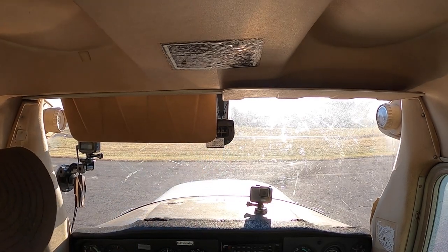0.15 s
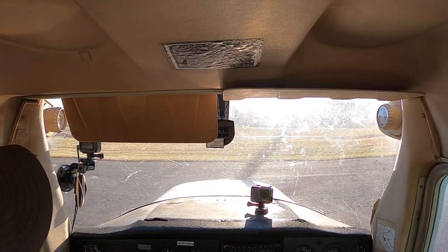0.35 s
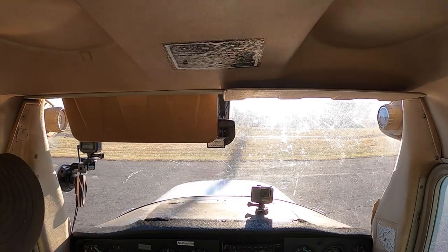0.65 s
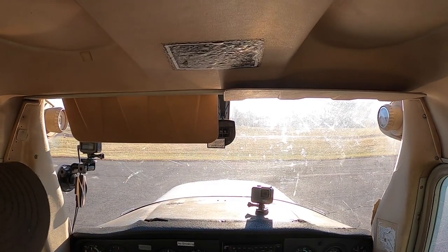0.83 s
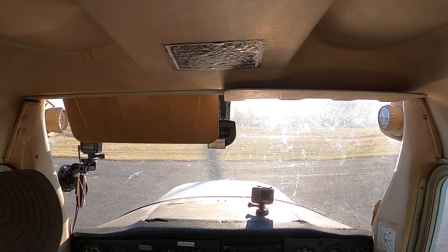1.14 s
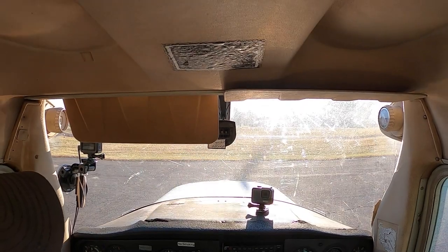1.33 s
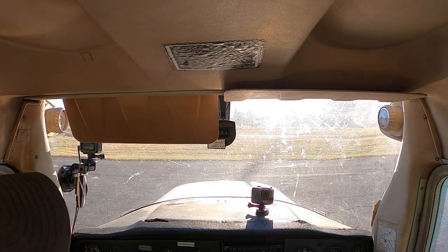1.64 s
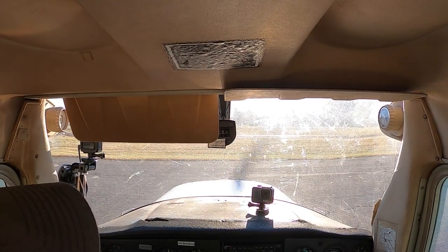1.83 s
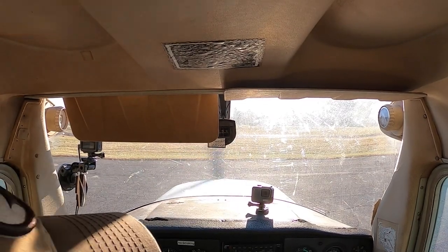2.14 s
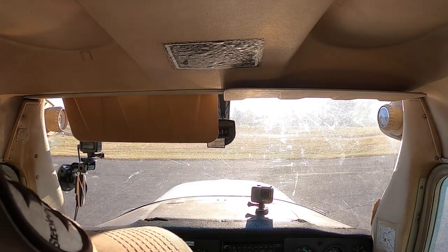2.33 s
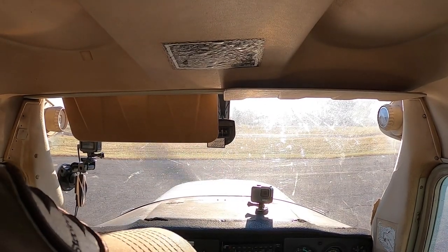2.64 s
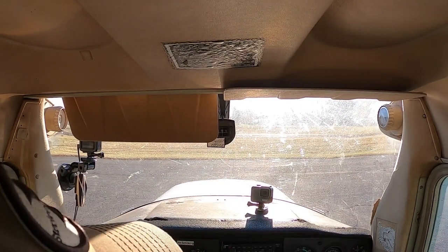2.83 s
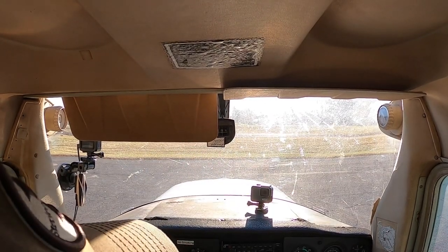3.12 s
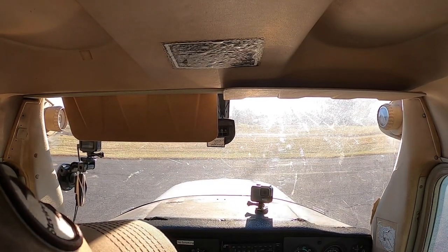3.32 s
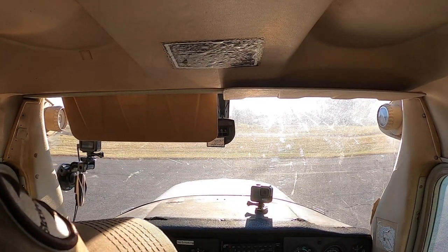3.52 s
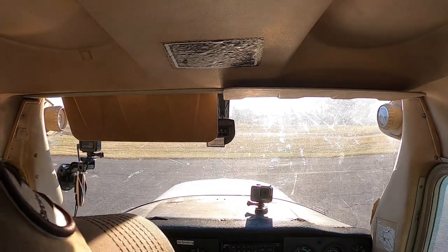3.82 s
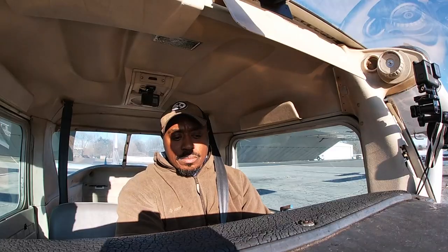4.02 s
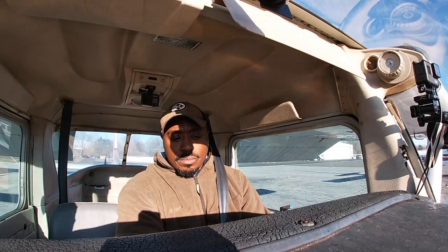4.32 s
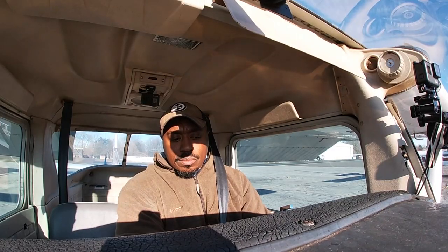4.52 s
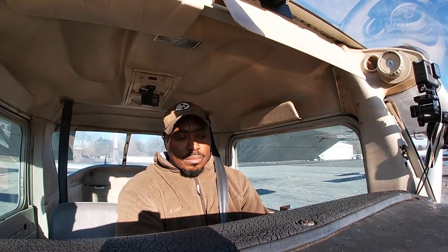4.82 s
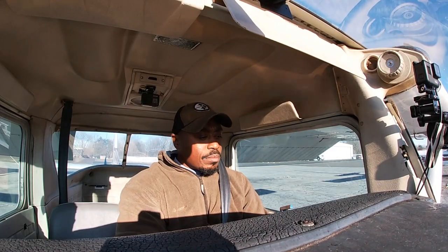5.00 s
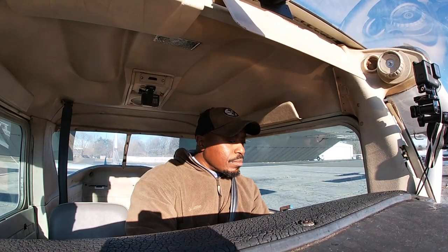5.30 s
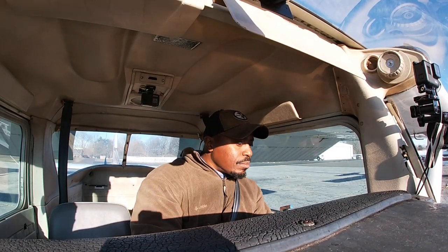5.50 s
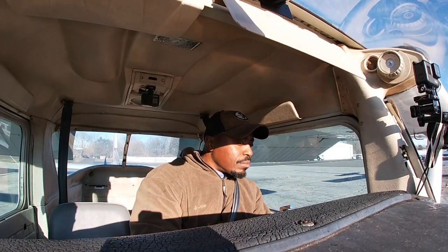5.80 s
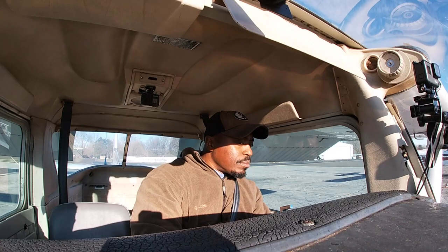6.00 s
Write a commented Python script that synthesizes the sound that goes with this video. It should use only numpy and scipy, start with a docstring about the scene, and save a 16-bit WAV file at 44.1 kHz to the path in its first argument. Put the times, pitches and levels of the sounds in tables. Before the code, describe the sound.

Inside a small plane's cabin, a piston engine catches with metallic clanks and heavy thumps, then climbs to a droning, finally lumpy idle with occasional sharp ticks.

```python
"""A four-cylinder light aircraft engine, heard in the cockpit, catches with a clank and a shudder over the starter's grind.
It runs up to a fast idle: low tones of exhaust and propeller excite the cabin's air modes as they rise.
Every firing rings noise in the panels, over a hiss of valve gear and prop wash; near four seconds the idle turns lumpy.
From early on, a sharp tick, probably the strobe light, repeats about every one and a half seconds."""
import sys
import numpy as np
from scipy import signal
from scipy.fft import rfft, irfft, next_fast_len
from scipy.io import wavfile
from scipy.ndimage import uniform_filter1d, minimum_filter1d, map_coordinates

SR = 44100
rng = np.random.default_rng(int(sys.argv[2]) if len(sys.argv) > 2 else 0)


def wrap_up_sound(samples):
    """Save the sound to the file named by the first command line argument, as 16-bit audio."""
    columns = np.atleast_2d(samples).T
    # keep every value between -1 and 1, then stretch to whole-number steps
    tamed = np.clip(columns, -1, 1)
    steps = np.round(tamed * 32767).astype(np.int16)
    wavfile.write(sys.argv[1], SR, steps)


N = 271215

# Unequal cylinders. Each entry: mean strength of one firing in the cycle, in dB.
FIRING_STRENGTHS = [1, -1, 3.5, -2]


def amp(db):
    """Decibel law: 20 dB is a tenfold amplitude."""
    return 10 ** (np.asarray(db) / 20)


def unit(x):
    """Power normalisation: scale to rms 1."""
    return x / np.sqrt(np.mean(x ** 2) + 1e-20)


def curves(rows):
    """Linear interpolation: one value per sample for each column after the time."""
    s, *cols = np.transpose(rows)
    return [np.interp(np.arange(N) / SR, s, c) for c in cols]


def wobble(rate):
    """Band-limited fluctuation: a smooth curve through random knots, rate of them a second."""
    knots = rng.standard_normal(int(N * rate / SR) + 4)
    return map_coordinates(knots, [np.arange(N) * rate / SR])


def resonance_db(hz, modes, order):
    """Resonance: lift in dB near each mode (Hz, width in Hz, lift in dB); order sets the skirts."""
    return sum(lift / (1 + (2 * (hz - centre) / width) ** order) for centre, width, lift in modes)


def colour(x, points, modes=()):
    """Minimum-phase filtering: the folded cepstrum makes a causal response through (Hz, dB) points."""
    m = 2 * next_fast_len(len(x) // 2 + SR // 4)
    hz = np.fft.rfftfreq(m, 1 / SR)
    f, points_db = np.transpose(points)
    db = np.interp(np.log(hz + 1), np.log(f), points_db)
    db = db + resonance_db(hz, modes, order=2)
    cepstrum = irfft(np.log(amp(db) + 1e-6))
    cepstrum[1:m // 2] *= 2
    cepstrum[m // 2 + 1:] = 0
    response = np.exp(rfft(cepstrum))
    return irfft(rfft(x, m) * response, m)[:len(x)]


def dying(t60):
    """Exponential decay: a half-second envelope falling 60 dB in each t60 seconds."""
    return np.exp(-np.log(1000) * np.arange(SR // 2) / SR / t60)


def burst(t60):
    """Diffuse decay: white noise under an exponential envelope."""
    return dying(t60) * rng.standard_normal(SR // 2)


def add(track, s, sound):
    """Superposition: mix a sound in at time s."""
    start = max(round(s * SR), 0)
    track[start:start + len(sound)] += sound[:N - start]


def engine(rate):
    """Impulsive excitation: firings drive the boom, the exhaust thud, the panels and the valve gear."""
    # Each row: frequency in Hz, relative level in dB.
    thud_spectrum = [(60, -29), (120, -2), (170, 1), (220, -2), (290, -7), (345, -10.5), (420, -17),
                     (700, -52.5), (1500, -93.5)]
    rattle_spectrum = [(200, -25), (330, 1), (450, 1), (620, 0.5), (800, -8.5), (950, -4), (1300, -12),
                       (1550, -17), (1850, -22.5), (2400, -32.5), (4000, -48), (7000, -86)]
    gear_spectrum = [(1000, -32.5), (1700, -2), (1830, -4), (1970, -5), (2180, -8.5), (2880, -9.5),
                     (3700, -13.5), (5450, -13), (7000, -29.5), (8110, -26.5), (9850, -25), (12900, -33),
                     (15500, -36.5)]
    # Cabin panel resonances. Each row: frequency in Hz, width in Hz, lift in dB.
    panel_modes = [(402, 68, 4), (533, 33, 4), (725.6, 16, 9), (874.5, 130, 4), (1377, 72, 6),
                   (2920, 130, 1.5)]
    # Layer gains. Columns: dB at smooth final idle, dB more at full effort,
    # dB per doubling of speed, dB more once lumpy.
    thud_gain = (-30.6, 11.5, -5.5, 2.4)
    rattle_gain = (-36, 20.5, 6, 3.6)
    gear_gain = (-54.4, 13.5, 1.3, 2.3)
    growl_s, growl_width_s, growl_db = .78, .14, 6  # one swell of the panels as it picks up speed

    turn = np.cumsum(rate * (1 + .002 * wobble(16))) / SR  # counts the firings
    thud = firings(turn, ring_t60=0.13, loose=0.5, scatter_db=2.0, depth=1.3)
    thud = unit(colour(thud, thud_spectrum))
    rattle = firings(turn, ring_t60=0.22, loose=0.63, scatter_db=1.0, depth=0.19)
    rattle = unit(colour(rattle, rattle_spectrum, panel_modes))
    gear = firings(turn, ring_t60=0.2, loose=.75, scatter_db=2.5, depth=0.26)
    gear = unit(colour(gear, gear_spectrum, panel_modes))

    swell = np.exp(-((np.arange(N) / SR - growl_s) / growl_width_s) ** 2)
    body = level(rate, *thud_gain) * thud
    body += amp(growl_db * swell) * level(rate, *rattle_gain) * rattle
    body += level(rate, *gear_gain) * gear
    return boom(turn, rate, waver_db=0.7) + body


def boom(turn, rate, waver_db, slip=0.014, stumble_db=1.3):
    """Harmonic series: low orders of exhaust and propeller, with the lope of unequal cylinders."""
    # Each row: order of the firing rate, level in dB before the cabin modes and layer gain.
    exhaust_orders = [(1, -35), (3, -36), (4, -39)]
    # Harmonics of the whole four-firing cycle, some of which sing in the panels.
    # Each row: harmonic number, level in dB before the layer gain.
    lope_harmonics = [(1, -39.5), (3, -42.5), (5, -30), (7, -29.5), (11, -37), (14, -40), (15, -39.5),
                      (19, -43.5), (20, -40.5), (24, -44.5), (27, -48.5), (32, -47.5), (41, -46.5),
                      (49, -50.5), (52, -50.5), (57, -49)]
    # Layer gains. Columns: dB at smooth final idle, dB more at full effort,
    # dB per doubling of speed, dB more once lumpy.
    exhaust_gain = (0, 1, -1.5, -2.5)
    lope_gain = (-6.2, 7, -2, 7.8)
    # The propeller tone, at twice the firing rate, fades below prop_full_hz.
    prop_base_db, prop_full_hz, prop_db_per_octave = -14, 65.6, 41.5
    prop_mode_share = 0.087  # share of the cabin's lift in dB

    def tone(phase):
        """Simple harmonic motion at rms 1, phase in cycles."""
        return np.sqrt(2) * np.cos(2 * np.pi * phase)

    blade_hz = 2 * rate
    octaves_below = np.minimum(0, np.log2(blade_hz / prop_full_hz))
    prop_db = prop_base_db + prop_db_per_octave * octaves_below + prop_mode_share * cabin_db(blade_hz)
    prop = amp(prop_db) * tone(2 * turn)

    exhaust = np.zeros(N)
    for order, db in exhaust_orders:
        order_db = db + cabin_db(order * rate) + waver_db * wobble(14)
        exhaust += amp(order_db) * tone(order * turn)

    cycle = turn / len(FIRING_STRENGTHS)
    lope = np.zeros(N)
    for k, db in lope_harmonics:
        # no two cycles burn alike, which blurs the higher harmonics most
        blur = slip * np.sqrt(k) * wobble(18)
        lope += amp(db + 1.8 * wobble(5)) * tone(k * cycle + rng.random() + blur)
    stumble = amp(stumble_db * wobble(9))
    return prop + level(rate, *exhaust_gain) * exhaust + level(rate, *lope_gain) * stumble * lope


def firings(turn, ring_t60, loose, scatter_db, depth):
    """Convolution: each cylinder repeats its own ring; a loose share of the power is fresh turbulence."""
    at = np.flatnonzero(np.diff(np.floor(turn))) + 1
    count = len(FIRING_STRENGTHS)
    cylinder = np.floor(turn[at]).astype(int) % count
    size = amp(np.take(FIRING_STRENGTHS, cylinder) + scatter_db * rng.standard_normal(len(at)))
    size = size / np.sqrt(np.gradient(turn)[at])  # the power stays even as the speed changes
    blows = np.zeros((count, N))
    blows[cylinder, at] = size
    rings = np.array([burst(ring_t60) for _ in range(count)])
    locked = signal.fftconvolve(blows, rings, axes=1)[:, :N].sum(axis=0)
    puffs = unit(signal.fftconvolve(blows.sum(axis=0), dying(ring_t60))[:N])
    gas = (1 + depth * puffs) * rng.standard_normal(N)
    return np.sqrt(1 - loose) * unit(locked) + np.sqrt(loose) * unit(gas)


def level(rate, idle_db, effort_db, octave_db, lumpy_db):
    """Source strength: a layer's gain follows effort, speed and the turn to a lumpy idle."""
    # It catches hard on the priming fuel, then eases. Each row: time in seconds, effort from 0 to 1.
    effort_curve = [(.01, .3), (.05, .7), (.3, 0.7), (.39, 1), (.45, .8), (.53, .24), (.62, .08),
                    (.95, 0.04)]
    lope_s, lope_onset_s = 3.99, 0.33  # when the idle turns lumpy, and how gradually
    effort, = curves(effort_curve)
    lumpy = (1 + np.tanh((np.arange(N) / SR - lope_s) / (2 * lope_onset_s))) / 2
    octaves = np.log2(rate / rate[-1])
    return amp(idle_db + effort_db * effort + octave_db * octaves + lumpy_db * lumpy)


def cabin_db(hz):
    """Room modes: the cabin's air lifts a low tone that sweeps through its resonances."""
    # Each row: frequency in Hz, width in Hz, lift in dB.
    air_modes = [(47.7, 12, 14.5), (78, 19, 19), (117.8, 19, 15.5), (146.8, 11, 9), (197.9, 14, 9)]
    return resonance_db(hz, air_modes, order=4)


def starter():
    """Modal excitation: clanks and a grind of irregular tooth blows ring the same steel."""
    # Starter and mounts clank as it catches. Each row: start in seconds, level in dB, t60 in seconds.
    clank_events = [(0.039, -18, 0.16), (.071, -24.5, 0.096), (0.124, -24, 0.26), (0.184, -26, 0.11),
                    (.25, -32, 0.14), (.317, -28.5, 0.33), (0.346, -24.5, 0.16)]
    # Each row: frequency in Hz, relative level in dB.
    metal_spectrum = [(200, -27), (450, -3), (650, -5), (900, 4), (1150, -5), (1600, -9.5), (2300, -10.5),
                      (3300, -14), (4200, -16.5), (5500, -19.5), (7000, -36.5), (8400, -33), (12000, -42.5),
                      (14000, -66.5)]
    # Ringing of the gear and mounts. Each row: frequency in Hz, width in Hz, lift in dB.
    steel_modes = [(865, 22, 10.5), (1384, 26, 8.5), (1600, 25, 3), (1846, 70, 7), (2560, 26, 4),
                   (2800, 84, 7.5)]
    # It labours against each compression stroke until it drops out and spins down.
    base_db, labour_db, first_stroke_s, stroke_s = -37.5, 4, .05, .15
    drop_out_s, spin_down_db_per_s = .44, 95
    teeth_per_s = 1100  # mean rate of random blows

    t = np.arange(N) / SR
    labour = np.cos(2 * np.pi * (np.minimum(t, drop_out_s) - first_stroke_s) / stroke_s)
    grind_db = base_db + labour_db * labour - spin_down_db_per_s * np.maximum(0, t - drop_out_s)
    teeth = (rng.random(N) < teeth_per_s / SR) * rng.standard_normal(N)
    out = amp(grind_db) * unit(colour(teeth, metal_spectrum, steel_modes))
    for s, db, t60 in clank_events:
        noise = unit(colour(rng.standard_normal(SR // 2), metal_spectrum, steel_modes))
        envelope = dying(t60) - dying(0.005)  # a short rise, then the decay
        add(out, s, amp(db) * envelope * noise)
    return out


def airframe(rate):
    """Forced and free vibration: the engine rocks on its mounts; hard firings ring the cabin briefly."""
    # Each row: frequency in Hz, relative level in dB.
    shake_spectrum = [(10, -19.5), (22, -1.5), (40, -6.5), (75, 0.5), (115, 2), (150, -13.5), (250, -41.5),
                      (500, -87)]
    # Columns: dB at smooth final idle, dB more at full effort, dB per doubling of speed, dB more once lumpy.
    shake_gain = (-29, 6, -8, 1.5)
    # The first hard firings kick the cabin. Each row: start in seconds, level in dB, pitch in Hz.
    kick_events = [(.056, -6, 215), (.072, -6, 111), (.09, -12, 35), (0.13, -4, 167), (.17, -7, 38.2),
                   (0.235, -8, 186), (0.31, -6.5, 116), (.358, -5, 182), (.398, -6.5, 118),
                   (.428, -12, 179), (.462, -14.5, 333)]
    kick_cycles = 18  # a kick dies by 60 dB in this many cycles

    out = level(rate, *shake_gain) * unit(colour(rng.standard_normal(N), shake_spectrum))
    t = np.arange(SR // 2) / SR
    for s, db, hz in kick_events:
        add(out, s, amp(db) * dying(kick_cycles / hz) * np.sin(2 * np.pi * hz * t))
    return out


def ticks():
    """Impulse response: strobe snaps with a short cabin tail, and softer clicks of loose fittings."""
    # Each entry: time of a strobe snap in seconds.
    strobe_times = [1.4312, 2.8775, 4.3241, 5.7622]
    # Clicks of loose fittings. Each row: start in seconds, level in dB before the trim and filter.
    fitting_clicks = [(0.123, -29.5), (.131, -36), (0.146, -35.5), (.603, -53), (1.073, -51), (2.153, -52),
                      (3.961, -47.5)]
    # Direct snap, then the cabin's answer to it. Each row: frequency in Hz, gain in dB.
    click_filter = [(800, -27), (2000, -0.5), (5500, 0.5), (7000, -1.5), (8400, 7), (10000, -2.5),
                    (13000, -3), (15500, -5.5)]
    tail_filter = [(500, -17.5), (1200, 5.5), (2500, 5), (5500, -4.5), (7000, -13), (12000, -19),
                   (15500, -26)]
    strobe_db = -25.5  # before the filters

    snaps, tails = np.zeros((2, N))
    for s in strobe_times:
        add(snaps, s, amp([strobe_db]))  # a spark is a single pulse
        add(tails, s, amp(strobe_db - 16.5) * burst(0.18))
    for s, db in fitting_clicks:
        add(snaps, s, amp(db - 4) * burst(.03))
    return colour(snaps, click_filter) + colour(tails, tail_filter)


def scene():
    """Superposition: all sources add at one microphone in the cabin."""
    # The engine runs up. Each row: time in seconds, mean firings per second.
    speed_curve = [(0, 16.9), (.55, 25.4), (.9, 33.2), (1.1, 36.55), (1.3, 39.6), (1.5, 42), (1.9, 44.4),
                   (2.35, 46.6), (3.1, 48.9), (3.6, 50), (4.3, 50.65), (5.3, 51.2), (6.15, 51.6)]
    rate, = curves(speed_curve)
    return (engine(rate) + airframe(rate) + starter() + ticks())[None]


def record(dry, ceiling=0.52):
    """Gain reduction and band limiting: a limiter eases the peaks down, then a sharp low-pass acts."""
    top_hz = 15700
    needed = np.minimum(1, ceiling / (np.abs(dry) + 1e-9))
    hold = SR // 80  # samples
    gain = uniform_filter1d(minimum_filter1d(needed, hold), 2 * hold)
    m = next_fast_len(N + SR // 2)
    passed = np.fft.rfftfreq(m, 1 / SR) < top_hz
    return irfft(rfft(dry * gain, m) * passed, m)[:, :N]


dry = scene()
out = record(dry)
wrap_up_sound(out)
```